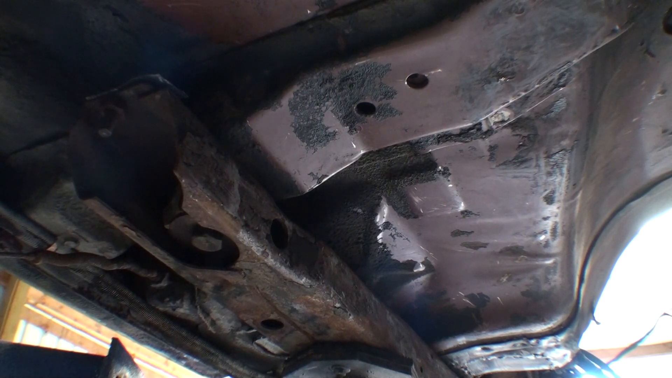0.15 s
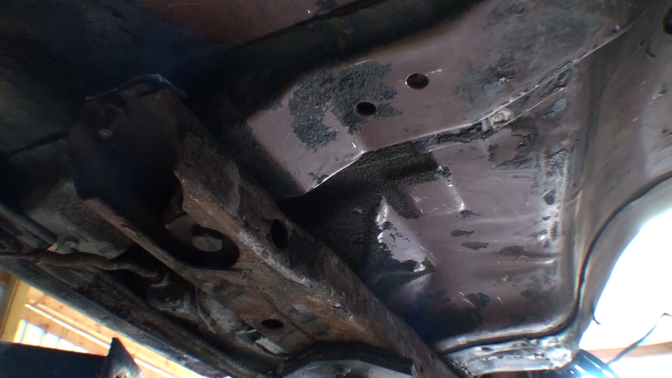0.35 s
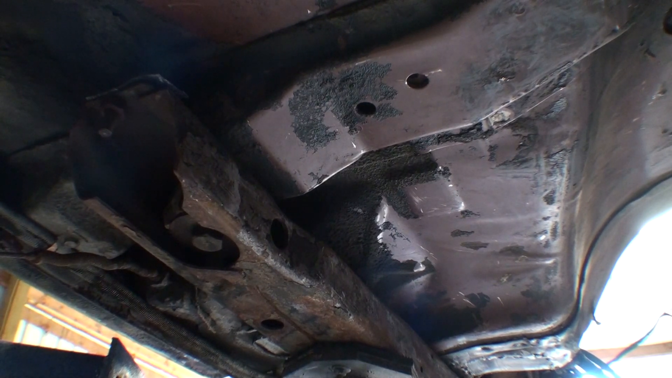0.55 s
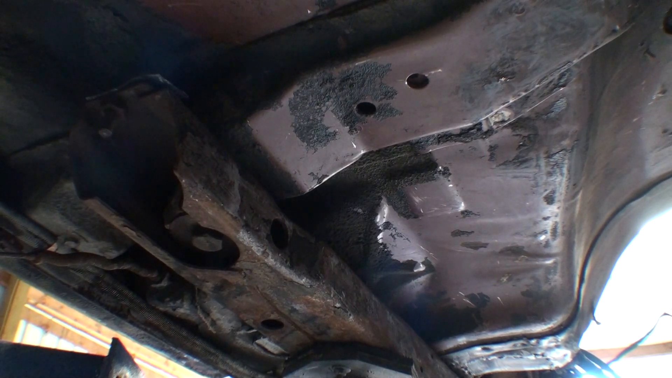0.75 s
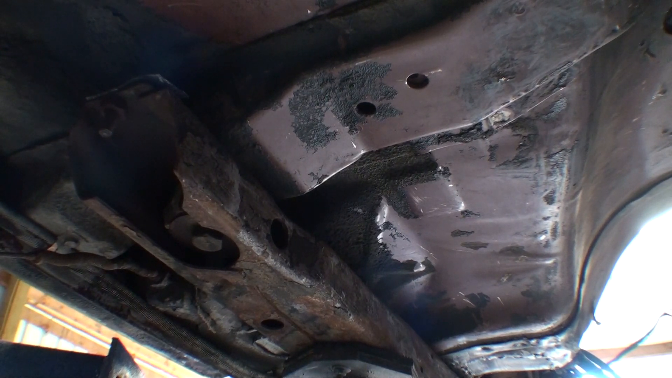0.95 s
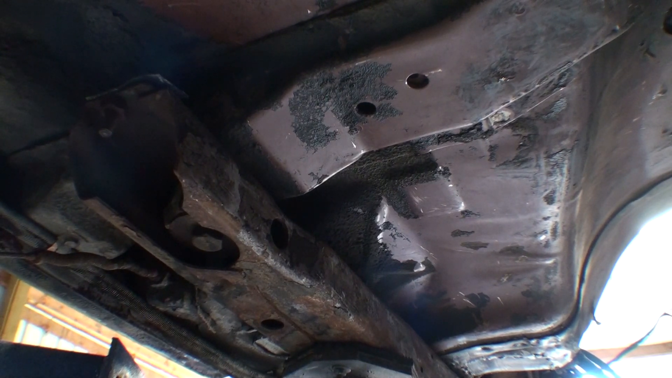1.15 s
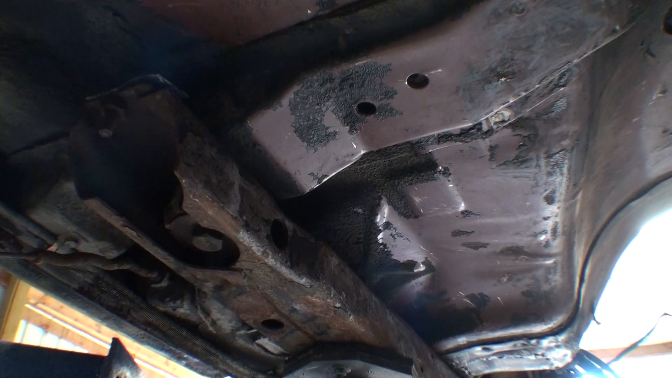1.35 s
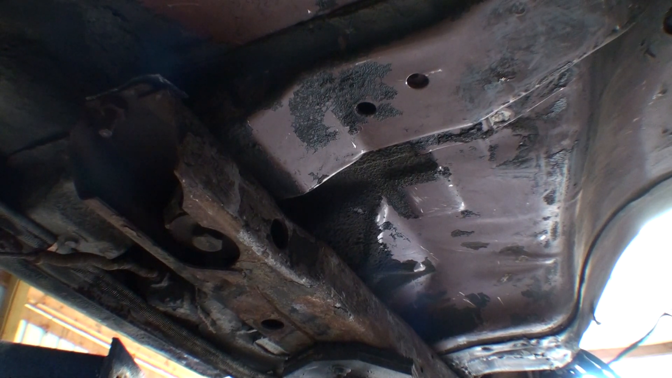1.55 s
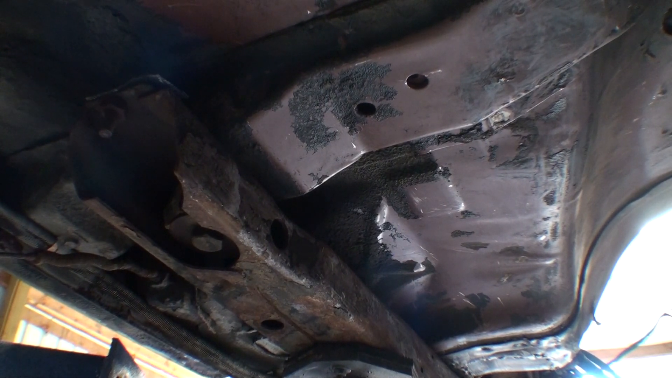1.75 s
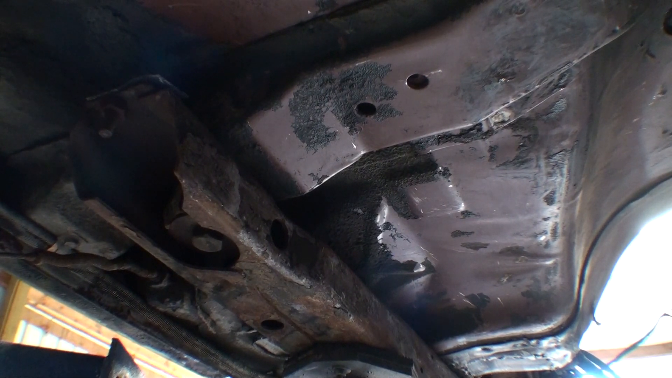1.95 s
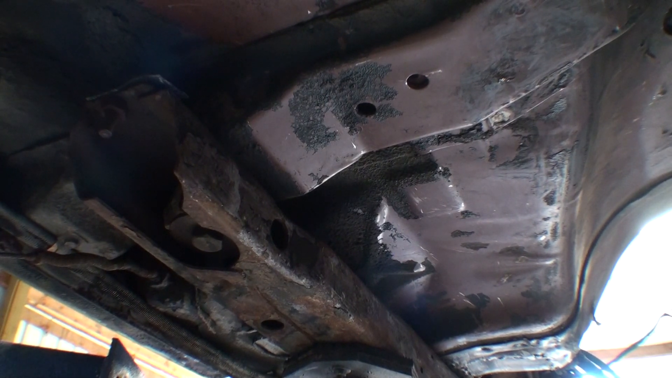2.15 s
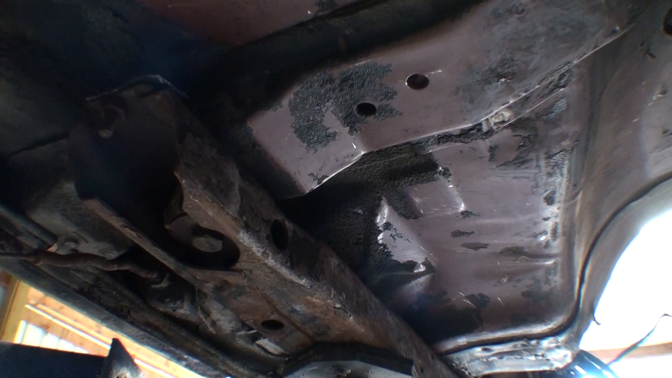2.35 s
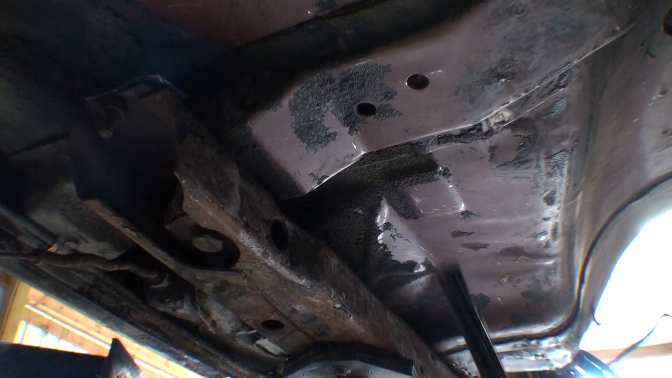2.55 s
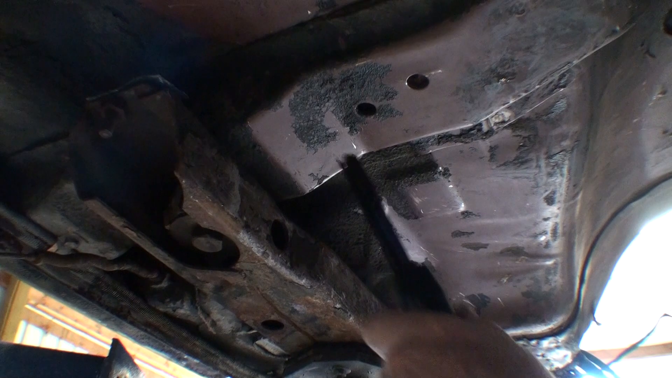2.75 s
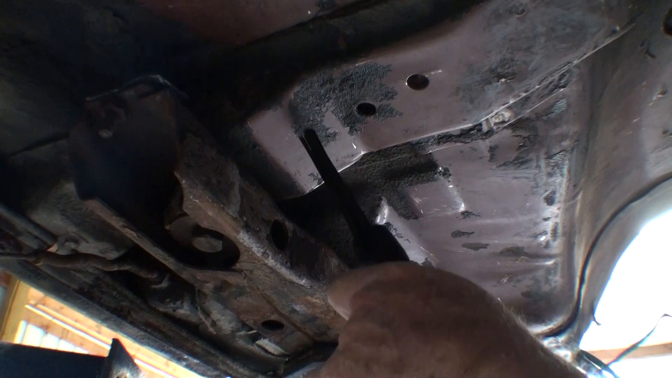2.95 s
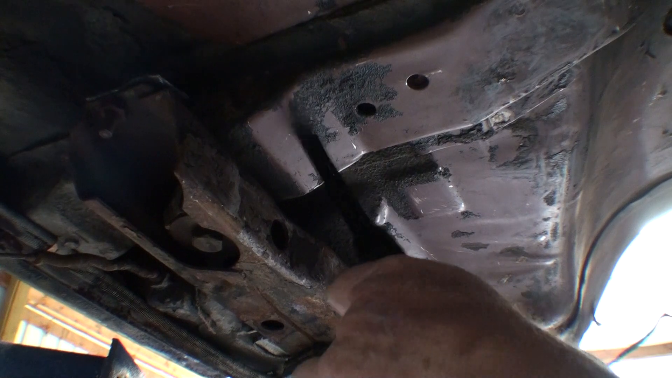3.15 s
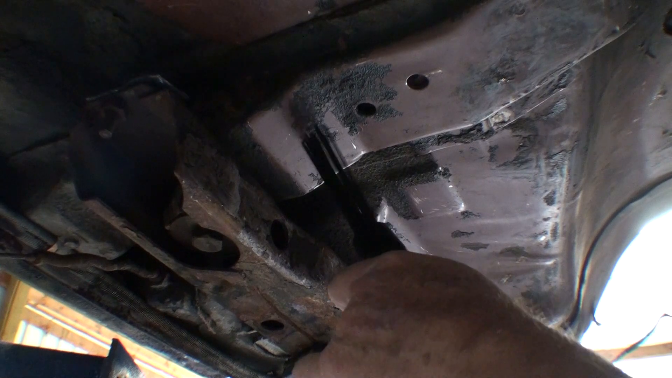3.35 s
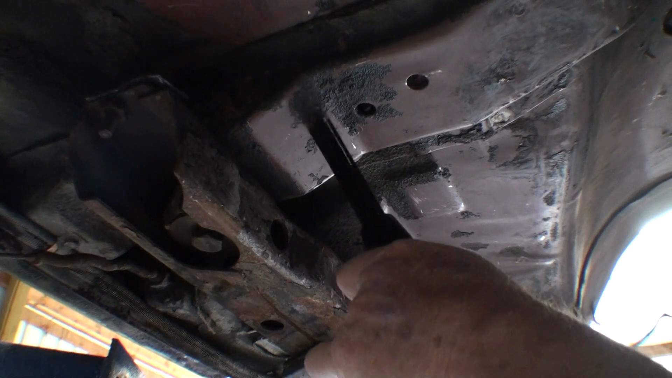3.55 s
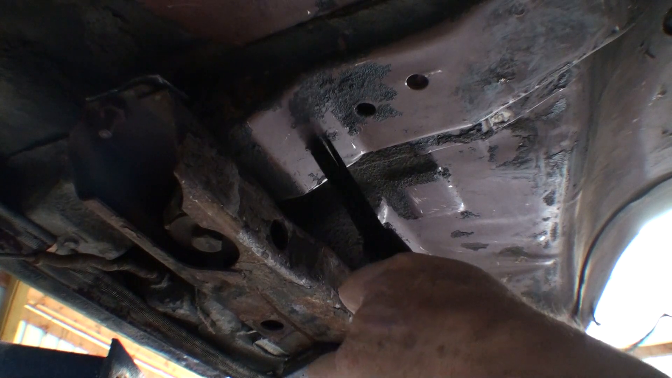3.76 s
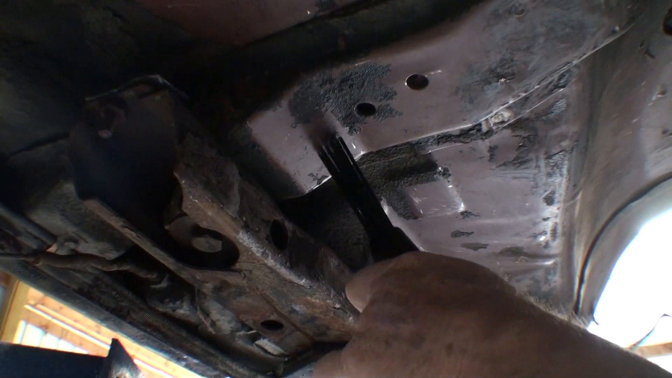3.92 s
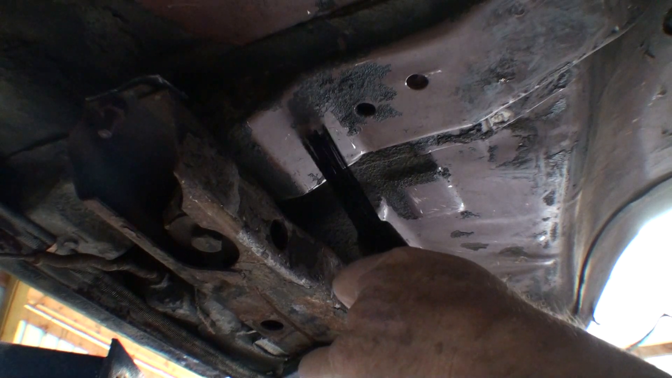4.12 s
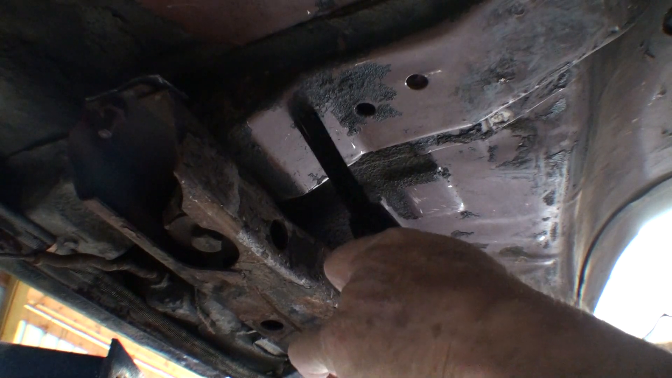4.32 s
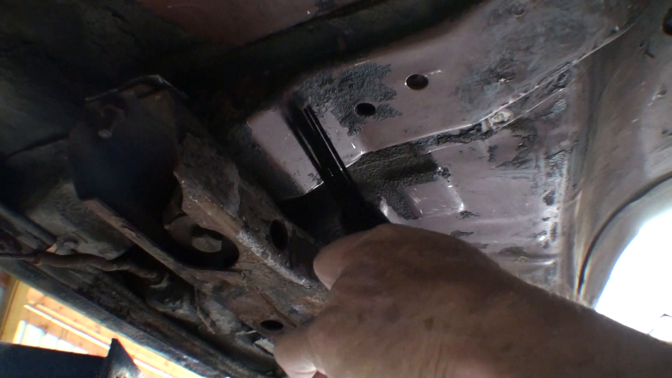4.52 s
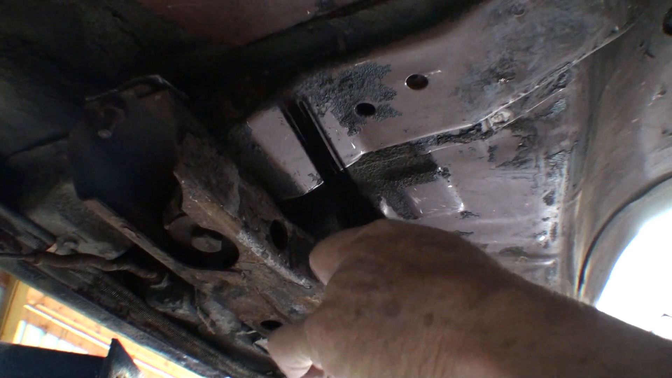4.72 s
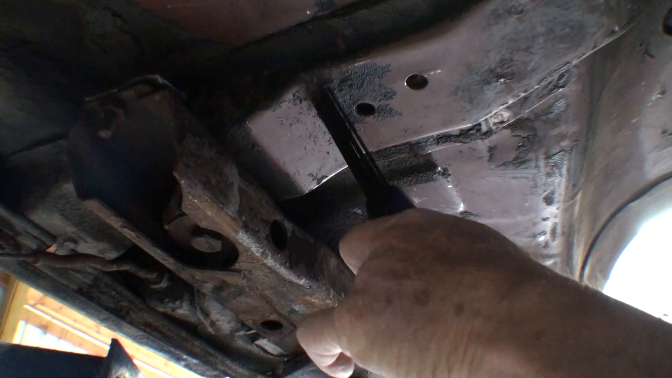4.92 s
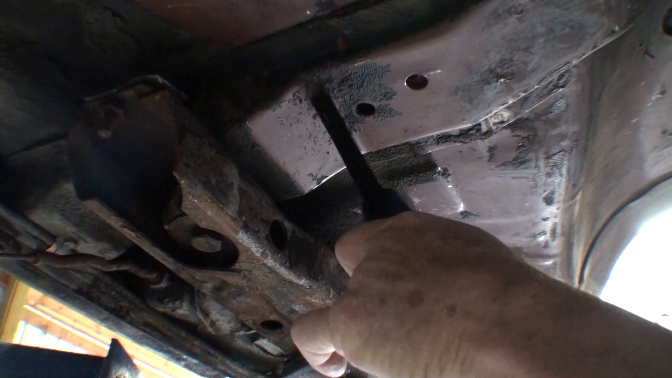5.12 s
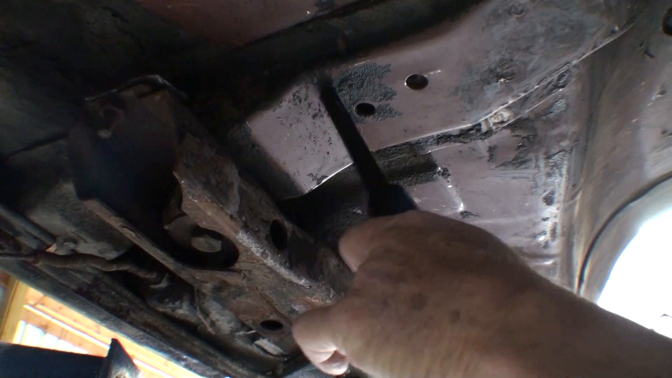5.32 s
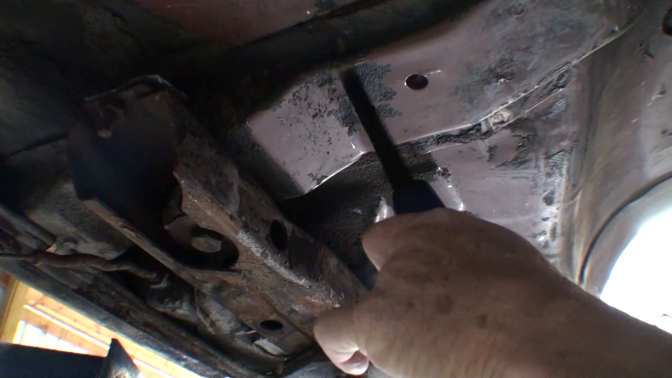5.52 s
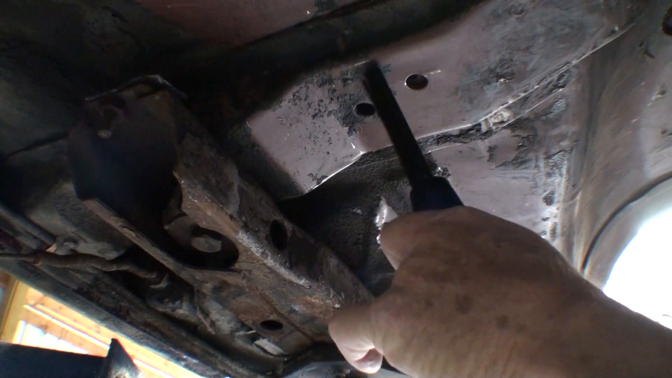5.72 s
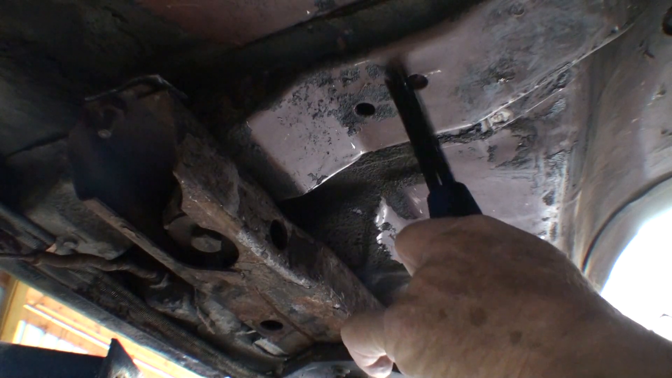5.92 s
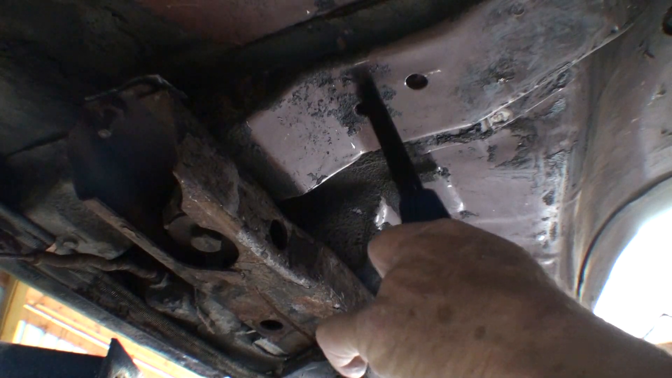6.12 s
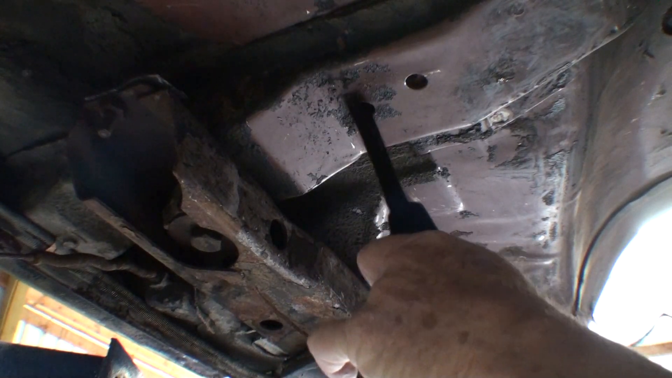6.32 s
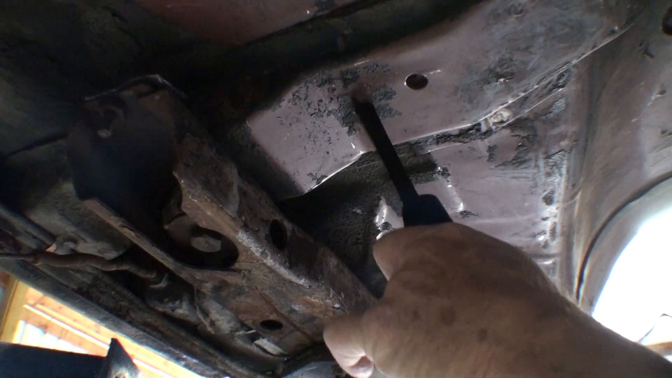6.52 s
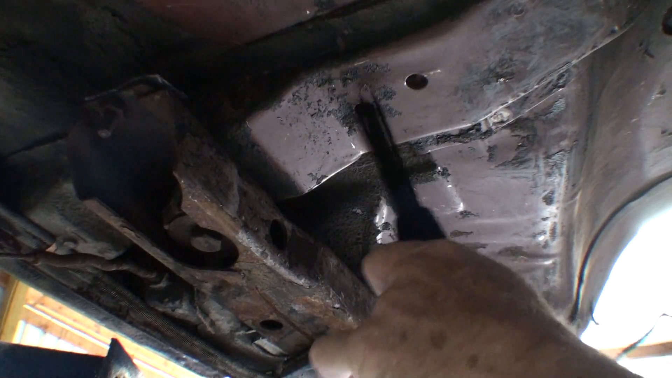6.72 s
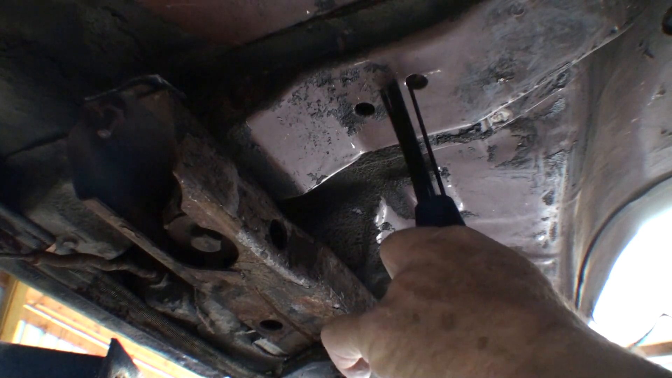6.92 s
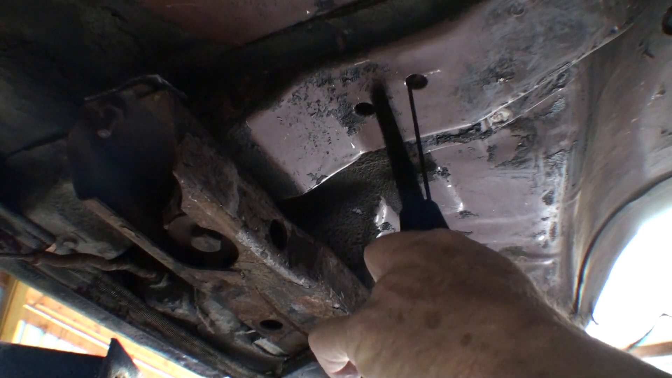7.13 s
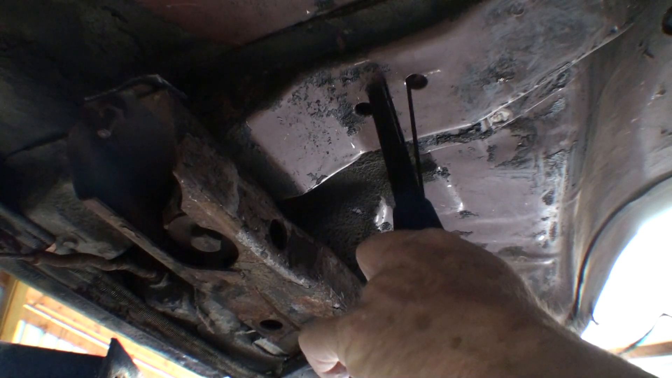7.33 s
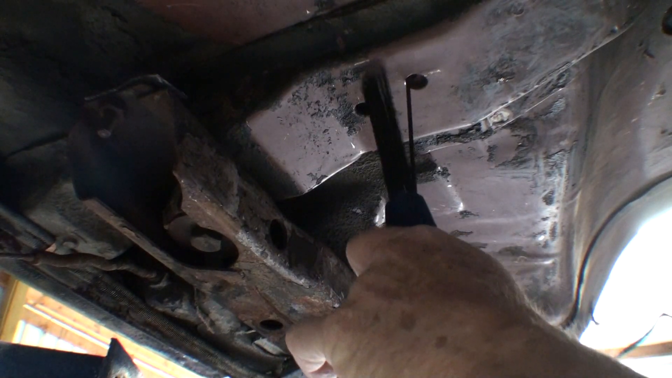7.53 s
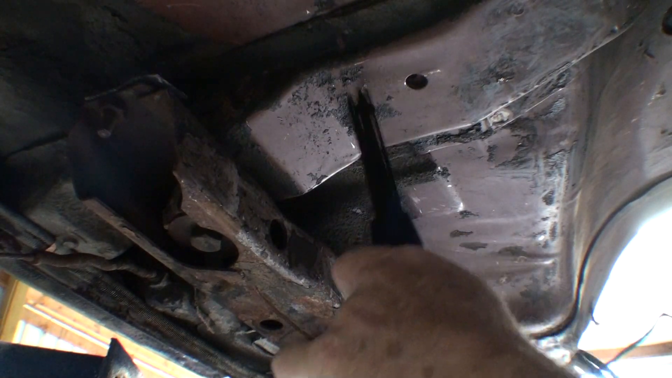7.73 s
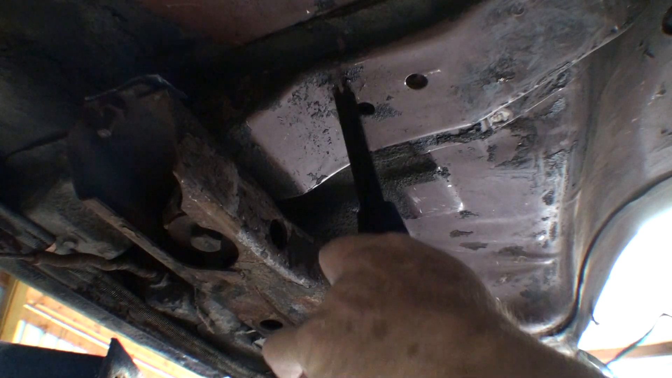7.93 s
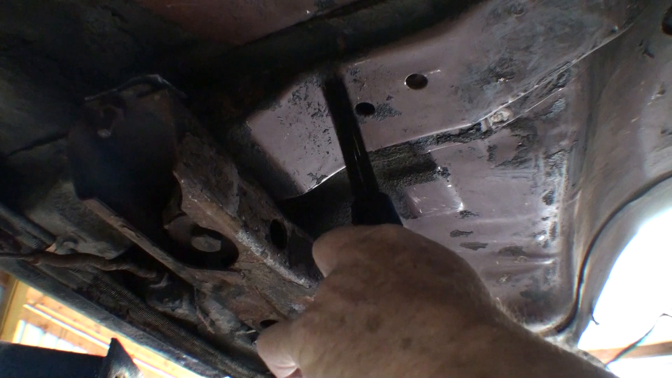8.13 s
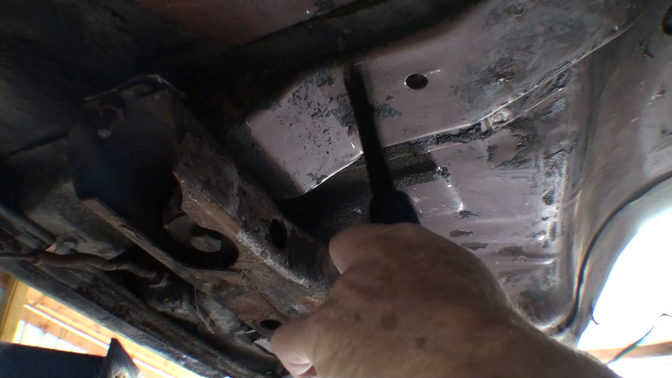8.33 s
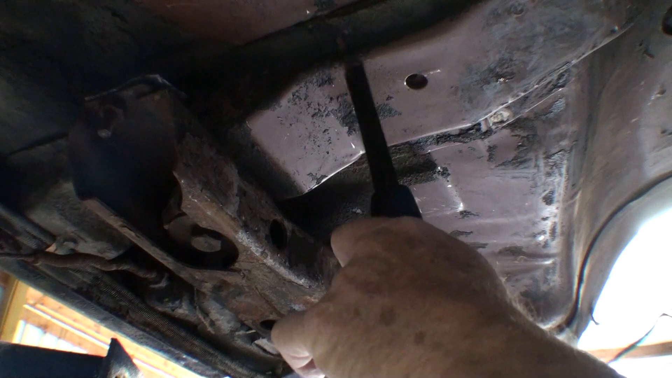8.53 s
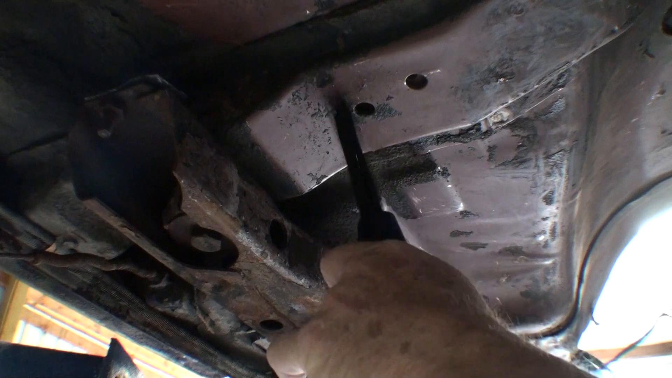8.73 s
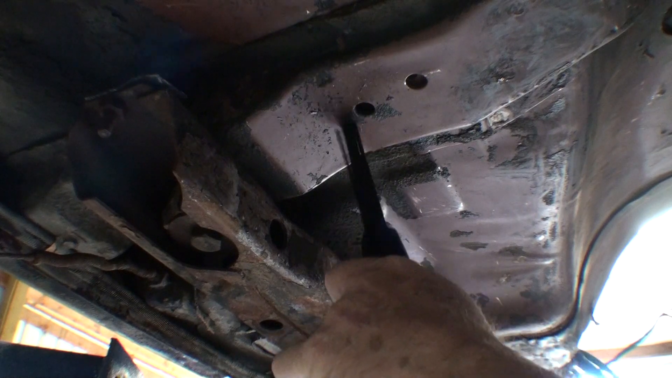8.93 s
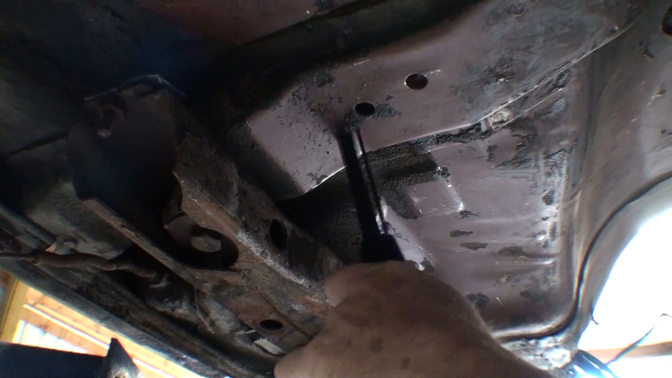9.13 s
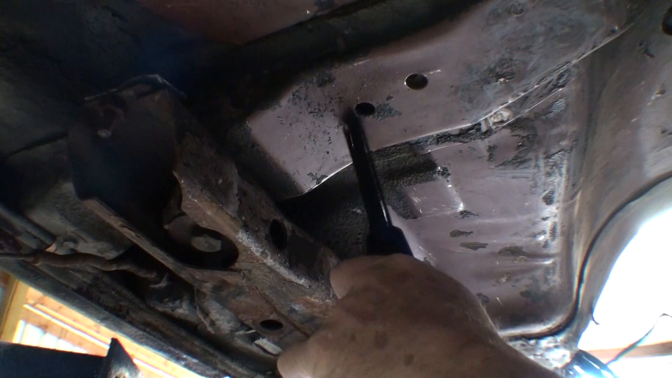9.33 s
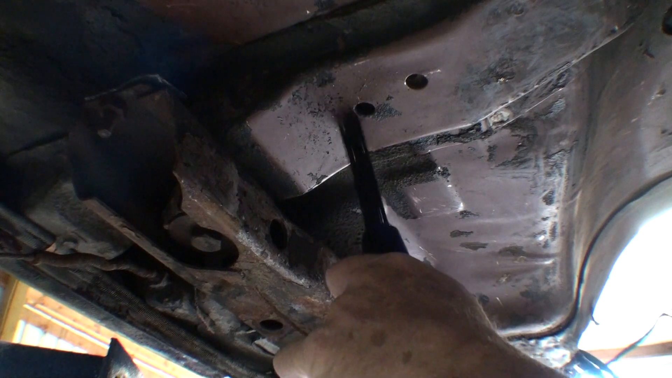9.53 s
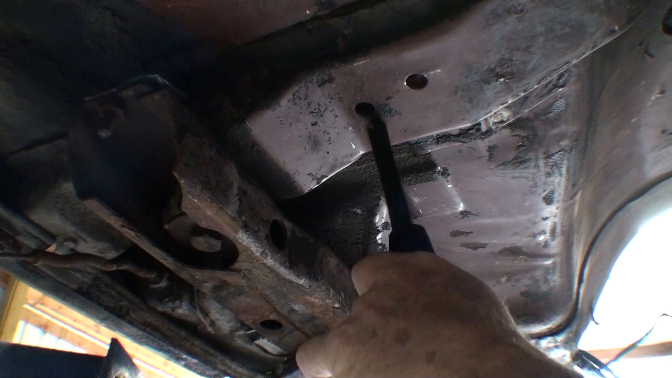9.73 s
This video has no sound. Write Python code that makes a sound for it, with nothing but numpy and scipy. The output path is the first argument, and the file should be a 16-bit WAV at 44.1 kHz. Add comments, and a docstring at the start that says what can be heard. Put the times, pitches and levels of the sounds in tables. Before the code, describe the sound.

Quiet airy hissing with scattered thuds and clacks comes first, then a needle scaler roars into action on thin steel, about seventy-three blows a second. The bright crash buzzes, pings and drums hollowly, its tone shifting as the tool travels. It drops out briefly twice to bare piston clatter. Close microphone, slightly overloaded at peaks, with a short garage reverberation and low room noise.

```python
"""An air needle scaler under a car floor in a garage, heard from close by.
First the leaking tool hisses, whistling airily as it moves, while knocks mark its handling for 2.9 s.
At 3.24 s the piston starts: some 73 strokes a second throw a bundle of needles at the floor pan, whose
sheet crashes, buzzes, drums and rings, with exhaust whistles and hum. The needles lift at 6.75 s and 7.8 s:
the crash falls away and the piston clacks dry and faster, then the work resumes to the end at 9.77 s."""
import sys
import numpy as np
from scipy import signal
from scipy.fft import rfft, irfft
from scipy.io import wavfile
from scipy.ndimage import uniform_filter1d

SR = 44100
rng = np.random.default_rng(int(sys.argv[2]) if len(sys.argv) > 2 else 0)


def int16_out(signal):
    """Quantize to a 16-bit WAV file."""
    q = np.round(np.clip(np.atleast_2d(signal).T, -1, 1) * 32767)
    wavfile.write(sys.argv[1], SR, q.astype(np.int16))


N = 430857
T = np.arange(N) / SR

TRIGGER_S = 3.241   # the piston starts
CUTOFF_HZ = 16500   # top of what the microphone signal keeps
# The needles come off the steel. Each row: start in seconds, end in seconds.
LIFT_SPANS = [(6.752, 6.86), (7.7955, 8.021)]


def from_db(db):
    """Decibels to gain."""
    return np.exp(np.asarray(db) * (np.log(10) / 20))


def rms_one(x):
    """Scale to rms 1."""
    return x / np.sqrt(np.mean(x ** 2) + 1e-20)


def in_time(rows):
    """Straight lines between the rows of a table, one curve per column after the time."""
    s, *columns = np.transpose(rows)
    return [np.interp(T, s, column) for column in columns]


def swell(middle_s, length_s):
    """A smooth rise to 1 and fall back to 0."""
    out = np.zeros(N)
    near = np.abs(T - middle_s) < length_s / 2
    out[near] = np.cos(np.pi * (T[near] - middle_s) / length_s) ** 2
    return out


def swelling(rows):
    """Gain of a ring that comes and goes; overlapping swells add in power."""
    return np.sqrt(sum(from_db(2 * db) * swell(s, length) for s, length, db in rows))


def drift(rate):
    """Smooth chance with spread about 1, from `rate` random points a second."""
    knots = rng.standard_normal(int(rate * N / SR) + 4)
    return np.interp(T * rate, np.arange(len(knots)), knots)


def coloured(x, spectrum):
    """Give a signal a spectrum, with a causal (minimum-phase) filter."""
    hz, db = np.transpose(spectrum)
    size = 4096
    grid = np.maximum(np.arange(size // 2 + 1) * SR / size, 1)
    level_db = np.interp(np.log(grid), np.log(hz), db)
    # folding the cepstrum onto positive time gives minimum phase
    cepstrum = irfft(np.log(from_db(level_db)))
    cepstrum[1:size // 2] *= 2
    response = irfft(np.exp(rfft(cepstrum[:size // 2], size)))
    return signal.oaconvolve(x, response)[:len(x)]


def noise(spectrum):
    """Steady noise of a given spectrum, rms 1."""
    return rms_one(coloured(rng.standard_normal(N), spectrum))


def narrow_noise(hz, width_hz, size=N):
    """Noise gathered around a steady or moving pitch, rms 1."""
    step = 8   # the slow envelopes are made at one eighth of the sample rate
    pole = np.exp(-2 * np.pi * width_hz * step / SR)
    slow = signal.lfilter([1], [1, -2 * pole, pole * pole], rng.standard_normal((2, N // step + 2)))
    in_phase, quadrature = (np.interp(np.arange(size) / step, np.arange(len(s)), s) for s in slow)
    phase = (2 * np.pi * (np.cumsum(hz * np.ones(size) / SR) % 1)).astype(np.float32)
    return rms_one(in_phase * np.cos(phase) + quadrature * np.sin(phase))


def ring(clicks, hz, t60):
    """A two-pole resonator: a unit click sets a dying sine of height about 1 ringing."""
    r, w = from_db(-60 / (t60 * SR)), 2 * np.pi * hz / SR
    return signal.lfilter([0, np.sin(w)], [1, -2 * r * np.cos(w), r * r], clicks + 1e-18)


def dying_noise(t60):
    """The response of countless close modes that die together; energy 1."""
    t = T[:SR // 2]
    tail = rng.standard_normal(len(t)) * from_db(-60 * t / t60)
    return tail / np.linalg.norm(tail)


def clicks_at(times, sizes):
    """A train of single-sample clicks."""
    at = np.round(np.ravel(times) * SR).astype(int)
    return np.bincount(np.maximum(at, 0), np.ravel(sizes), N)[:N]


def contacts(strokes, delay_ms, scatter_ms, uneven_db, count):
    """Each stroke shares its energy among several contacts, each late and strong by chance."""
    times, force = strokes
    shape = (len(times), count)
    late_s = (delay_ms + scatter_ms * rng.exponential(1, shape)) / 1000
    shares = from_db(uneven_db * rng.standard_normal(shape)) * rng.choice([-1, 1], shape)
    shares /= np.linalg.norm(shares, axis=1, keepdims=True)
    return clicks_at(times[:, None] + late_s, force[:, None] * shares)


def struck(clicks, modes, wander_db=1.5, wander_per_s=7):
    """Modes driven by one click train; each swells and fades as the needles travel over its nodes."""
    out = 0
    for k, (hz, db, t60) in enumerate(modes):
        gain = from_db(db + wander_db * drift(wander_per_s))
        out = out + (-1) ** k * gain * rms_one(ring(clicks, hz, t60))
    return rms_one(out)


def even(x, span_s=0.124):
    """Hold a running sound at rms 1 over several strokes; silent before the trigger."""
    running = T >= TRIGGER_S
    width = int(span_s * SR)
    share_running = np.maximum(uniform_filter1d(running * 1., width), 1e-3)
    power = uniform_filter1d(x * x, width) / share_running
    return running * x / np.sqrt(np.abs(power) + 1e-12)


def scaler():
    """One train of piston strokes drives the needles, the sheet, the exhaust and the hum."""
    # The needles skid and bite less. Each row: middle in seconds, length in seconds, loss in dB.
    skids = [(3.467, 0.081, 6), (5.062, 0.47, 7), (5.532, 0.58, 7), (5.802, 0.086, 3.5), (5.08, 0.047, 5),
             (6.49, 0.25, 3), (6.65, 0.086, 6.5), (8.22, 0.21, 2), (8.437, 0.16, 3.5), (8.756, 0.11, 9),
             (8.826, 0.049, 8), (8.915, 0.22, 5.5), (9.052, 0.19, 8), (9.371, 0.42, 3), (9.682, 0.3, 3)]
    # The shaking floor hums on the stroke rate. Each row: multiple of the rate, rms level in dB
    # under load.
    hum_orders = [(1, -62), (2, -54.5), (3, -49.5), (4, -64)]
    # Drumming of the floor pan. Each row: time in seconds, middle level in dB with the needles on.
    drum_level = [(3.25, -30), (3.32, -35.5), (4.3, -37.5), (5.1, -31.5), (5.6, -34.5), (6.7, -32.5),
                  (7.5, -35.5), (8.3, -32), (9.77, -33.5)]
    jitter_s, stroke_spread_db = .00025, 1.8
    tremor_db, tremor_per_s = 1.3, 13   # the hand is never quite steady
    clack_db, free_clack_gain_db = -32.5, 5.5
    drum_wander_db, lift_drum_loss_db, free_hum_gain_db = 2.2, 17, -3

    running, lifted = T >= TRIGGER_S, off_the_steel(ease_s=0.0039)
    times = stroke_times()
    turns = np.interp(T, times, np.arange(len(times)))   # strokes counted so far
    late, strong = rng.standard_normal((len(times), 2)).T
    strokes = times + jitter_s * late, from_db(stroke_spread_db * strong)

    skid_db = sum(db * swell(s, length) for s, length, db in skids)
    loss_db = skid_db + tremor_db * drift(tremor_per_s)
    # off the steel the bare piston clacks harder
    regular = times, np.ones(len(times))
    clack = from_db(clack_db + free_clack_gain_db * lifted) * piston_clack(regular)
    drum_db = in_time(drum_level)[0] - lift_drum_loss_db * lifted + drum_wander_db * drift(7.4)
    drum = from_db(drum_db) * pan_drumming(strokes)
    hum = sum(from_db(db) * np.sqrt(2) * np.sin(2 * np.pi * order * turns) for order, db in hum_orders)
    hum = from_db(free_hum_gain_db * lifted) * hum
    return needles(strokes, loss_db, lifted) + clack + drum + running * (exhaust(turns, lifted) + hum)


def stroke_times():
    """The piston's strokes wander a little under load and run quick and regular when free."""
    loaded_per_s, free_per_s, wander_per_s = 72.6, 79.7, .7   # strokes per second
    edges = np.r_[TRIGGER_S, np.ravel(LIFT_SPANS), N / SR]
    times = []
    for k, (start, end) in enumerate(zip(edges, edges[1:])):
        speed = free_per_s if k % 2 else loaded_per_s + wander_per_s * drift(7)
        # each stretch, and so each landing, starts with a blow
        turns = np.cumsum(speed * (T >= start) * (T < end - .5 / loaded_per_s)) / SR
        times.append(T[np.flatnonzero(np.diff(np.ceil(turns)))])
    return np.concatenate(times)


def off_the_steel(ease_s):
    """1 while the needles are lifted, 0 while they touch, with eased edges."""
    lifted = sum(1. * (T > start) * (T < end) for start, end in LIFT_SPANS)
    return uniform_filter1d(lifted, max(int(ease_s * SR), 1))


def needles(strokes, skid_db, lifted):
    """Crash and woken rings; a skid dulls the sheet more than the tips, a lift weakens them all."""
    # How hard the hand presses. Each row: time in seconds, crash level in dB before skids and lifts.
    pressure = [(3.25, -22), (4.6, -21.5), (5.35, -22), (5.95, -21.5), (6.7, -25), (6.88, -20.5),
                (7.3, -20), (7.78, -22.5), (8.55, -21), (9.77, -20.5)]
    # Needle buzz, strongest near the stiff edge of the panel.
    # Each row: time in seconds, level in dB before skids and lifts.
    buzz_level = [(3.25, -24.5), (4.6, -24.5), (4.95, -29), (5.2, -29), (5.38, -29), (5.5, -41),
                  (6.75, -35), (6.9, -32.5), (7.7, -38), (8.7, -47), (8.98, -27), (9.22, -40), (9.77, -55)]
    # Modes of the buzz. Each row: frequency in Hz, relative level in dB, 60 dB decay in seconds.
    buzz_modes = [(1925, -6.5, 0.028), (2161, 1.5, 0.029), (2239, 1, 0.03), (2665, -6, 0.04),
                  (6510, -3, 0.026), (6990, -11, 0.062)]
    # Overtones of the buzz. Each row: frequency in Hz, relative level in dB, 60 dB decay in seconds.
    overtone_modes = [(3930, -12, 0.02), (4150, -7, .015), (4300, -3, 0.022), (6900, -13, 0.021),
                      (8330, -16, 0.031)]
    # The needles cross a spot that wakes the overtones.
    # Each row: middle in seconds, length in seconds, peak level in dB.
    overtone_swells = [(3.92, 0.3, -27), (4.25, 0.65, -28), (4.6, 0.5, -27.5), (4.83, 0.14, -27)]
    tip_hz = 5740   # above this the crash is the scratch of the needle tips, below it the sheet
    buzz_follows, tip_follows = 1.0, 0.72   # share of a skid's loss that each takes
    lift_loss_db, ring_gain_db = 20, 4.5

    (crash_db,), (buzz_db,) = in_time(pressure), in_time(buzz_level)
    full = from_db(crash_db) * needle_crash(strokes)
    above = signal.butter(2, tip_hz, "high", fs=SR, output="sos")
    scratch = signal.sosfiltfilt(above, full)
    sheet = full - scratch
    crash = from_db(-skid_db) * sheet + from_db(-tip_follows * skid_db) * scratch
    # the needles bend and slap their collar twice as they spring back
    slaps = contacts(strokes, delay_ms=3.5, scatter_ms=.5, uneven_db=4, count=2)
    slaps = slaps + contacts(strokes, delay_ms=7.2, scatter_ms=.6, uneven_db=12, count=2)
    buzz = from_db(buzz_db - buzz_follows * skid_db) * even(struck(slaps, buzz_modes))
    tips = contacts(strokes, delay_ms=0.37, scatter_ms=1.2, uneven_db=8, count=3)
    overtone = swelling(overtone_swells) * even(struck(tips, overtone_modes))
    rings = from_db(ring_gain_db) * high_ring(strokes)
    return from_db(-lift_loss_db * lifted) * (crash + buzz + overtone + rings)


def needle_crash(strokes, count=20):
    """Needles land on their own spots of the sheet, each with a sharp crack and its own ring."""
    # Spectrum of the crash. Each row: frequency in Hz, relative density in dB per Hz.
    crash_spectrum = [(60, -37), (300, -13), (700, -7), (1150, -3.5), (1400, -5.5), (1780, -2.5),
                      (2400, -7.5), (3200, -1.5), (3750, -2.5), (4100, -3.5), (4400, -2.5), (4750, -3),
                      (5200, 0), (6500, -2), (8400, -1), (9000, -4.5), (9700, -6.5), (10600, -6.5),
                      (11100, -8), (11700, -7), (12600, -9), (13900, -13), (16500, -6)]
    spot_colour_db, spot_t60_s = 5.5, .06   # each spot of the sheet has its own colour
    # the load jumps among the spots on every stroke and shifts slowly as the tool travels
    load_jump_db, load_travel_db = 9, 2
    steel_db = -5

    times, force = strokes
    grid = np.geomspace(60, CUTOFF_HZ, 110)
    shares = from_db(spot_colour_db * rng.standard_normal((count, len(grid))))
    shares /= np.linalg.norm(shares, axis=0)
    travel = np.array([np.interp(times, T, drift(5.4)) for _ in range(count)])
    jumps = rng.standard_normal((count, len(times)))
    loads = from_db(load_travel_db * travel + load_jump_db * jumps)
    loads /= np.linalg.norm(loads, axis=0)
    sheet = 0
    for share, load in zip(shares, loads):
        group = contacts((times, force * load), delay_ms=.1, scatter_ms=1.3, uneven_db=4, count=2)
        crack_and_ring = dying_noise(0.017) + from_db(10.5) * dying_noise(spot_t60_s)
        spot = coloured(crack_and_ring, np.c_[grid, 20 * np.log10(share)])[:SR // 8]
        sheet = sheet + signal.oaconvolve(group, spot)[:N]
    crash = rms_one(coloured(sheet, crash_spectrum))
    return even(crash + from_db(steel_db) * steel_pings(strokes), span_s=0.065)


def steel_pings(strokes):
    """Every stroke wakes each mode of the steel with a new strength, so a few ping out at a time."""
    # Modes of the steel. Each row: frequency in Hz, relative level in dB, 60 dB decay in seconds.
    steel_modes = [(1596, 0, .08), (1932, 1, .06), (2170, 0, .05), (2414, 3, .06), (2530, 1, .06),
                   (2674, 0, .05), (2980, 1, .04), (3170, -1, .05), (3322, -2, .045), (3620, -1, .05),
                   (3860, -2, .05), (5600, -1, .03), (5980, 0, .035), (6160, 1, .035), (6560, -2, .04),
                   (6830, -1, .04), (6988, 1, .04), (7320, -1, .035), (7550, -1, .035), (7920, 1, .03),
                   (8150, -1, .035), (8400, -1, .03), (9020, -4, .03)]
    ping_spread_db = 7
    times, force = strokes
    out = 0
    for hz, db, t60 in steel_modes:
        chance = np.minimum(rng.standard_normal(len(times)), 2)
        caught = force * from_db(ping_spread_db * chance)
        taps = contacts((times, caught), delay_ms=.1, scatter_ms=1.2, uneven_db=2, count=1)
        out = out + from_db(db) * rms_one(ring(taps, hz, t60))
    return rms_one(out)


def high_ring(strokes):
    """On each spot one high ring of the steel takes over, struck anew by every stroke."""
    # Each row: middle in seconds, length in seconds, relative peak level in dB, frequency in Hz.
    ring_swells = [(3.31, 0.11, -32, 7100), (3.648, .35, -37, 6080), (4.504, .35, -38, 8300),
                   (4.9, 0.057, -43, 8350), (5.132, 0.073, -36.5, 5180), (5.213, 0.08, -32, 7000),
                   (5.332, 0.19, -35.5, 8430), (5.35, 0.09, -33, 6960), (5.4, 0.54, -43, 11950),
                   (5.534, 0.29, -43, 8520), (5.498, 0.26, -45, 5240), (5.68, 0.14, -37, 5270),
                   (5.918, 0.59, -42, 3120), (6.0, .6, -43.5, 11430), (6.02, 0.18, -33.5, 5150),
                   (6.363, 0.27, -33.5, 5130), (6.573, 0.14, -31.5, 5100), (6.93, 0.14, -38, 5170),
                   (7.1, 0.2, -37.5, 5160), (7.55, 0.57, -42, 5110), (7.64, .35, -42, 7800),
                   (8.133, 0.2, -34, 5170), (8.42, 0.5, -35.5, 5230), (8.414, 0.29, -40, 2420),
                   (8.7, 0.4, -39, 5230), (8.901, 0.32, -38, 5010), (8.975, .14, -35.5, 6970),
                   (9.166, 0.14, -38, 5120), (9.21, .16, -40, 8350), (9.55, .3, -37, 6770),
                   (9.63, 0.43, -38, 5130)]
    ring_t60_s, ring_spread_db = .03, 1.5
    times, force = strokes
    out = np.zeros(N)
    for s, length, db, hz in ring_swells:
        caught = force * from_db(ring_spread_db * rng.standard_normal(len(times)))
        tips = contacts((times, caught), delay_ms=1.0, scatter_ms=.8, uneven_db=0, count=1)
        gain = swell(s, length)
        on = np.flatnonzero(gain)
        out[on] += from_db(db) * np.sqrt(np.sqrt(gain[on])) * rms_one(ring(tips[on], hz, ring_t60_s))
    return out


def pan_drumming(strokes):
    """Blow and weaker return of the piston shake low floor-pan modes, which waver under the load."""
    # Spectrum of the dense drumming. Each row: frequency in Hz, relative density in dB per Hz.
    drum_spectrum = [(55, -48), (90, -9), (125, -5), (180, -2.5), (260, -6), (360, 3), (470, 0), (580, -2),
                     (800, 9.5), (1000, 9), (1250, 4), (1600, -9.5), (3000, -53)]
    # Modes of the floor pan. Each row: frequency in Hz, relative level in dB, 60 dB decay in seconds.
    pan_modes = [(423, -10, 0.06), (412.3, -7.5, 0.11), (542.6, 1.5, 0.11), (628, -3, 0.033),
                 (687, -2, 0.085), (776, -4, 0.031), (954, -16, 0.043), (996, -2.5, 0.044)]
    waver_s, waver_per_s = .0005, 22   # the resonances waver as the needles push on the panel

    blow = contacts(strokes, delay_ms=0.28, scatter_ms=0.36, uneven_db=4.5, count=2)
    back = contacts(strokes, delay_ms=6.807, scatter_ms=1.188, uneven_db=2, count=2)
    push = blow + from_db(-3) * back
    # two tails for each kind of hit, every one with its own drift
    tails = sum(signal.oaconvolve(hits * drift(8), dying_noise(0.17))[:N] for hits in (blow, back) * 2)
    dense = rms_one(coloured(push + 0.33 * tails, drum_spectrum))
    panel = dense + from_db(-4.5) * struck(push, pan_modes, wander_db=4)
    return even(np.interp(T - waver_s * drift(waver_per_s), T, panel))


def piston_clack(strokes):
    """The piston hits the anvil in a short, dry burst; the barrel adds a hollow knock of varying force."""
    # Spectrum of the clack. Each row: frequency in Hz, relative density in dB per Hz.
    clack_spectrum = [(50, -29), (200, -3), (650, 0), (960, 4.5), (1300, -6), (1700, -6), (2400, -1),
                      (3200, -3.5), (3700, -4), (4100, -13), (4700, -2), (5300, -1), (6500, 2), (7500, -3),
                      (8500, 2.5), (9500, -5.5), (11800, -2), (12700, -3), (16000, -31)]
    barrel_hz, barrel_t60_s, barrel_db, barrel_spread_db = 970, 0.018, -7.5, 8
    times, force = strokes
    anvil = contacts(strokes, delay_ms=0, scatter_ms=1.5, uneven_db=2, count=60)
    barrel_force = force * from_db(barrel_spread_db * rng.uniform(-1.1, 1, len(times)))
    blows = clicks_at(times, barrel_force)
    barrel = from_db(barrel_db) * rms_one(ring(blows, barrel_hz, barrel_t60_s))
    return even(rms_one(coloured(anvil, clack_spectrum)) + barrel)


def exhaust(turns, lifted):
    """Spent air whistles out in narrow bands, with a slight puff on every stroke."""
    # Each row: frequency in Hz, width in Hz, relative level in dB, gain in dB while the piston runs free.
    whistle_bands = [(10320, 110, 4, 0.5), (12100, 260, -15, 6), (13050, 150, 1.5, 6), (16300, 150, -3, 11)]
    whistle_db, puff_depth = -46, 0.15
    whistles = 0
    for hz, width, db, free_db in whistle_bands:
        gain = from_db(db + free_db * lifted + 0.82 * drift(6.5))
        whistles = whistles + gain * narrow_noise(hz, width)
    puffs = 1 + puff_depth * np.sin(2 * np.pi * (turns - .2))
    return from_db(whistle_db) * whistles * puffs


def clinks():
    """A needle jumps against its neighbours or an edge: a short, bright band of dying noise."""
    # Single needles clink in the hand, snap as the valve opens and clang where they catch an edge.
    # Each row: start in seconds, energy in dB, low edge in Hz, high edge in Hz, 60 dB decay in seconds.
    single_needles = [(2.376, -14, 4000, 5600, 0.018), (3.233, 2, 3520, 8470, 0.017),
                      (5.67, 2.5, 2350, 3030, .12), (5.811, 0, 2300, 2980, 0.12),
                      (6.185, 3, 2280, 3230, 0.16), (6.385, 2, 3300, 3940, 0.092),
                      (6.572, -0.5, 2370, 2980, .08), (8.021, 0, 2200, 9000, .03),
                      (8.063, 3, 2600, 3150, 0.079), (8.334, 2, 2350, 2980, 0.18),
                      (8.62, 0, 2345, 3020, 0.17), (9.245, 2, 1770, 4100, .08)]
    out = 0
    for s, db, low_hz, high_hz, t60 in single_needles:
        burst = signal.oaconvolve(clicks_at([s], [1.]), dying_noise(t60))[:N]
        band = signal.butter(3, [low_hz, high_hz], "band", fs=SR, output="sos")
        bright = signal.sosfilt(band, burst)
        out = out + from_db(db) * bright / np.linalg.norm(bright)
    return out


def handling():
    """Tool and hose bump about: a soft thud, a hollow ring and a short clack each time."""
    # Each row: start in seconds, thud strength in dB, hollow ring strength in dB,
    # clack starting level in dB, clack middle in Hz, clack 60 dB decay in seconds.
    bumps = [(.015, -51, -47, -47, 2210, 0.55), (0.404, -62, -62, -59, 208, 0.75),
             (.556, -31.5, -41, -45, 2400, 0.18), (.578, -46, -52, -38, 3570, 0.16),
             (0.597, -44, -50, -52, 3000, 0.13), (0.824, -48, -60, -47.5, 850, 0.26),
             (.862, -54, -65, -48.5, 900, .15), (1.056, -54, -65, -40, 4000, .09),
             (1.368, -39.5, -54, -49, 2500, .1), (1.41, -44, -58, -41, 4170, 0.25),
             (1.802, -51, -22.5, -39, 1500, 0.13), (1.827, -42, -52, -56, 1190, .1),
             (2.139, -32.5, -47, -49, 600, 0.15), (2.156, -50, -40, -35.5, 5170, 0.086),
             (2.589, -55, -35, -51, 605, .08), (2.679, -64, -48, -37, 3500, .04),
             (2.789, -57, -38, -70, 319, 0.36), (2.815, -75, -35, -60, 600, .1),
             (2.849, -73, -41, -56, 600, .1)]
    # Modes of the thud. Each row: frequency in Hz, relative level in dB, 60 dB decay in seconds.
    thud_modes = [(81, -15, .18), (121, -6.5, 0.084), (190, -3, 0.073), (250, -13.5, 0.23),
                  (416, -9.5, 0.067), (583, -4, 0.024)]
    # Modes of the hollow ring. Each row: frequency in Hz, relative level in dB, 60 dB decay in seconds.
    hollow_modes = [(270, -22, 0.13), (299, -8.5, 0.13), (567, -22.5, 0.15)]

    times, thud_db, hollow_db = np.transpose(bumps)[:3]
    soft = signal.butter(1, 1500, fs=SR)
    out = np.zeros(N)
    for modes, blow_db in ((thud_modes, thud_db), (hollow_modes, hollow_db)):
        for hz, db, t60 in modes:
            spread_db = rng.normal(0, 2.2, len(times))
            blows = clicks_at(times, from_db(blow_db + db + spread_db))
            out += ring(signal.lfilter(*soft, blows), hz, t60) * rng.choice([-1, 1])
    t = T[:SR // 2]
    for s, _, _, clack_db, hz, t60 in bumps:
        edges_hz = [hz / 2.26, min(hz * 1.86, SR / 2 - 1)]
        band = signal.butter(2, edges_hz, "band", fs=SR, output="sos")
        grain = rms_one(signal.sosfilt(band, rng.standard_normal(len(t))))
        start = int(s * SR)
        out[start:start + len(t)] += grain * from_db(clack_db - 60 * t / t60)
    return out


def air_leak():
    """A small jet, coloured by resonances that come and go as the tool is brought up to the floor pan."""
    # Leaking air. Each row: time in seconds, level in dB that the hiss and its whistles are set against.
    leak_level = [(.15, -55), (.7, -41.5), (.97, -44.5), (1.15, -40), (1.5, -37.5), (2.25, -40.5),
                  (2.48, -40), (2.66, -36), (3.2, -39)]
    # The hollow tone as the tool is turned.
    # Each row: time in seconds, frequency in Hz, level in dB against the leak.
    leak_tone = [(.7, 2490, -27), (1.199, 2740, -15.5), (1.999, 2870, -21), (2.25, 2650, -24),
                 (2.33, 1900, -24), (2.4, 1900, -16), (2.52, 1936, -19), (2.63, 1990, -9),
                 (2.85, 2310, -12), (3.199, 2370, -8.5)]
    # Airy whistles that stand out and sweep as the tool moves.
    # Each row: middle in seconds, length in seconds, middle frequency in Hz, glide in Hz per second,
    # width in Hz, peak level in dB against the leak.
    leak_bands = [(.45, 0.7, 6950, -4, 110, -8), (.7, .3, 11200, 300, 110, -15),
                  (1.1, .6, 8480, -2, 120, -11), (1.17, 0.64, 11850, 0, 190, -9),
                  (1.25, 0.99, 5270, -300, 150, -12), (1.36, 0.4, 7250, 3, 110, -11),
                  (1.55, .4, 9400, 700, 120, -13), (1.55, .4, 10500, 700, 120, -17),
                  (1.61, .42, 11900, -4500, 190, -9), (1.85, 0.72, 4380, -1, 149, -15),
                  (1.93, .6, 8520, -300, 150, -11), (2.027, 0.55, 10100, -2200, 150, -14),
                  (2.068, .4, 15200, -3000, 400, -14), (2.218, .24, 9150, -1200, 110, -11),
                  (2.33, .36, 8100, -1500, 120, -10), (2.628, 0.13, 10130, 0, 80, -13),
                  (2.704, .3, 8400, 2500, 110, -18), (2.777, 0.19, 13150, 0, 80.5, -13),
                  (2.788, 0.11, 10250, 0, 80, -8), (2.802, 0.32, 12450, -2000, 170, -17),
                  (2.998, 0.68, 8000, -600, 130, -12), (3.05, 0.77, 4430, 1, 150.3, -16),
                  (3.051, .8, 5570, 152, 100, -13), (3.1, .7, 3420, -1, 130, -17),
                  (3.098, .6, 6720, 0, 80, -10), (3.1, .5, 6320, 2, 80, -9),
                  (3.15, .55, 11850, 0, 200, -11)]
    # Spectrum of the near jet. Each row: frequency in Hz, relative density in dB per Hz.
    jet_spectrum = [(1180, -12.5), (2000, -14), (2490, -7), (3000, -4.5), (3430, -6), (3880, -3.5),
                    (5420, -1), (8360, 1), (10800, -1.5), (11900, 0.5), (13000, -4), (13900, -10),
                    (15300, -6.5), (16500, -6.5)]
    # The leak as it comes back from the garage. Each row: frequency in Hz, relative density in dB per Hz.
    far_spectrum = [(1000, -18), (2000, -8.5), (2600, 1), (3500, -5.5), (5000, -0.5), (7500, 2),
                    (9500, -5.5), (12500, -11), (14000, -16), (16500, -14)]
    jet_db, far_db = -3.5, -51   # plain hiss against the leak; steady far hiss

    (hiss_db,), (tone_hz, tone_db) = map(in_time, (leak_level, leak_tone))
    jet = noise(jet_spectrum)
    echoes = 0
    for delay_ms in (1.3, 2.25, 3.7, 6.1):
        late_s = (delay_ms + 0.04 * drift(2.4)) / 1000
        echoes = echoes + drift(3.43) * np.interp(T - late_s, T, jet)
    hiss = rms_one(jet + 0.55 * echoes)
    whistles = from_db(tone_db) * narrow_noise(tone_hz, width_hz=170)
    for s, length, hz, glide, width, db in leak_bands:
        gain = swell(s, length)
        on = np.flatnonzero(gain)
        sweep_hz = hz + glide * (T[on] - s)
        whistles[on] += from_db(db) * np.sqrt(gain[on]) * narrow_noise(sweep_hz, width, size=len(on))
    near = from_db(hiss_db) * (from_db(jet_db) * hiss + whistles)
    return near + from_db(far_db) * noise(far_spectrum)


def garage_reverberation(near):
    """The garage answers after 10 ms with a diffuse tail of dying noise."""
    t60_s, level_db = 0.36, -7.5
    tail = np.r_[np.zeros(SR // 100), dying_noise(t60_s)]
    return from_db(level_db) * signal.oaconvolve(near, tail)[:N]


def garage_noise():
    """Steady, mostly low noise of the room."""
    # Spectrum of the room. Each row: frequency in Hz, relative density in dB per Hz.
    garage_spectrum = [(25, 1), (60, 2), (120, 4.5), (200, -1), (350, -8.5), (1000, -6), (2000, -12),
                       (6000, -10)]
    return from_db(-51.5) * noise(garage_spectrum)


def scene():
    """Tool and knocks close by, with a little garage reverberation, the leak and room noise."""
    near = scaler() + clinks() + handling()
    return (near + garage_reverberation(near) + air_leak() + garage_noise())[None]


def record(dry, top=0.3):
    """At the microphone peaks are rounded towards `top`, the deep bass is lost, the treble is cut."""
    rounded = dry / (1 + (dry / top) ** 8) ** .125
    high_pass = signal.butter(2, 55, "high", fs=SR, output="sos")
    heard = signal.sosfilt(high_pass, rounded)
    low_pass = signal.ellip(12, .1, 80, CUTOFF_HZ, fs=SR, output="sos")
    return signal.sosfilt(low_pass, heard)


dry = scene()
out = record(dry)
int16_out(out)
```